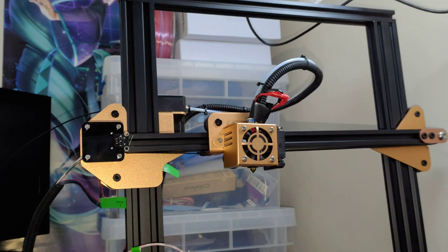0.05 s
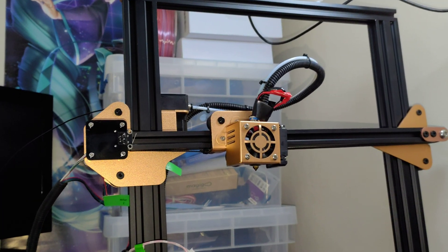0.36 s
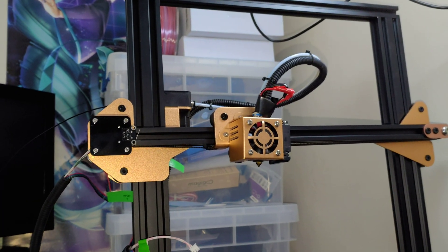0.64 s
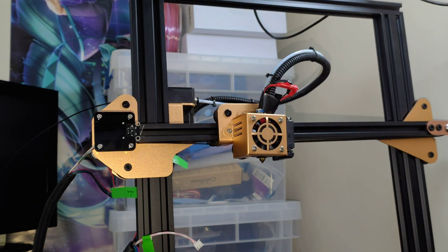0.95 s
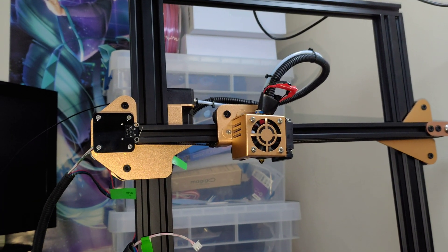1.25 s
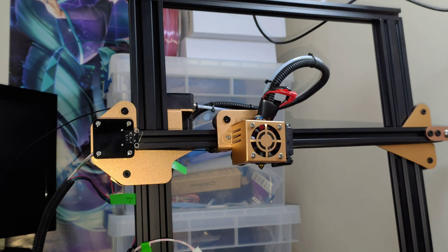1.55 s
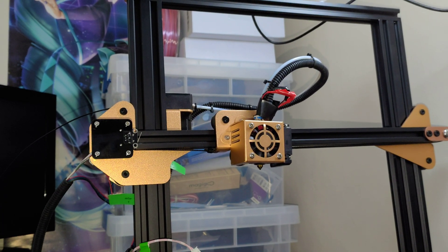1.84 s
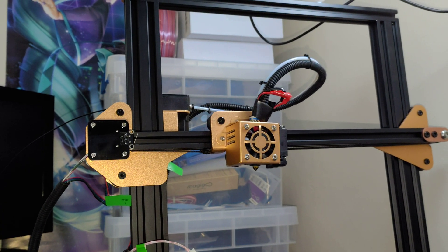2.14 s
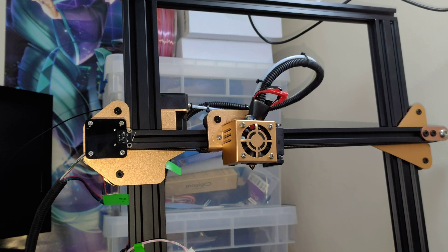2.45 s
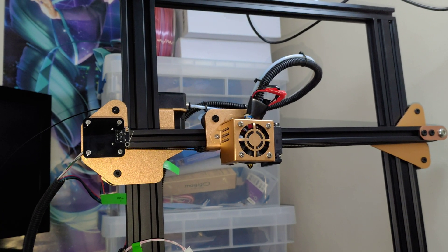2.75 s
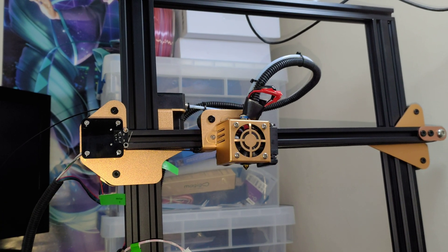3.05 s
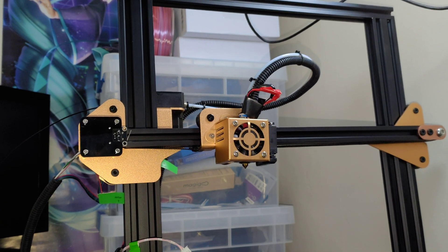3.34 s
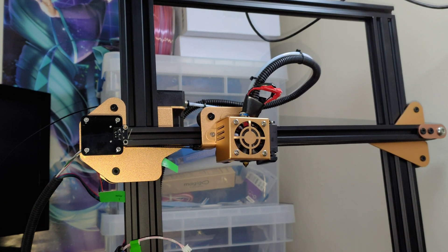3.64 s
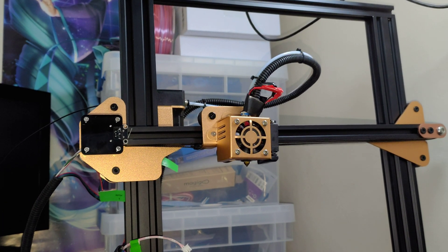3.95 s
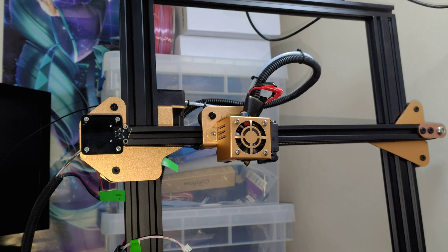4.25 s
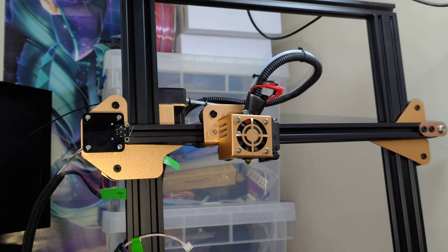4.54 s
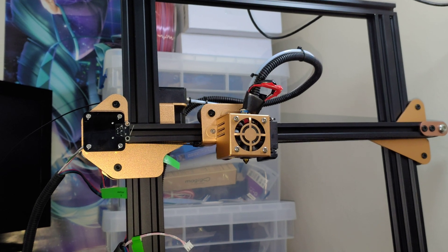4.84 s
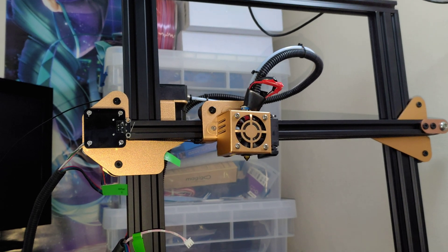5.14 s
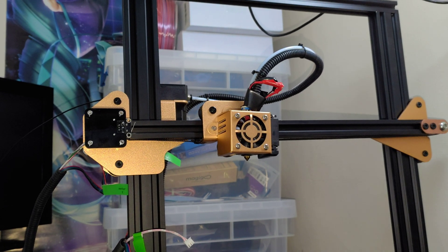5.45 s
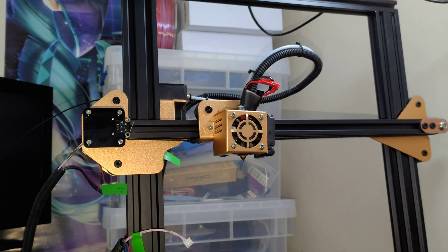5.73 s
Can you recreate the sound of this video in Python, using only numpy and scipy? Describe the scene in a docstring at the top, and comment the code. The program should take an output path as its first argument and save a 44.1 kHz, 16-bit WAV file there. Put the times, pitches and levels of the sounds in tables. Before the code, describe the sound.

After two close clicks, a small stepper motor jogs a printer carriage in five brief buzzing bursts, with ticks and a few soft knocks.

```python
"""Two sharp button clicks, close to a stereo microphone in a small room, over faint hum and hiss.
Then a stepper motor jogs the belt-driven carriage of a 3D printer five times. Each move jolts,
speeds up, cruises and brakes: the step orders sweep through the frame's resonances, belt and wheels
chatter, tick and squeak, and the carriage shudders on its belt while the speed changes.
Three soft knocks sound nearby, one before the moves and two towards the end."""
import sys
import numpy as np
from scipy import signal
from scipy.fft import rfft, irfft
from scipy.io import wavfile

SR = 44100
rng = np.random.default_rng(int(sys.argv[2]) if len(sys.argv) > 2 else 0)


def master(y):
    """Save y as 16-bit WAV."""
    cut = np.clip(np.atleast_2d(y).T, -1, 1)
    pcm = np.round(cut * 32767)  # scale
    wavfile.write(sys.argv[1], SR, pcm.astype(np.int16))


N = 264159
T = np.arange(N) / SR

# The carriage's moves. Each row: start, speed-up, cruise and braking in seconds, steps per second at
# the outset, then relative levels in dB of motor hum, jolt, chatter, braking bounce and stopping sway.
MOVES = [(2.058, .092, 0.079, 0.04, 50, -5, -5, -29.5, -35, -54),
         (2.902, .075, 0.069, 0.048, 110, -4.5, 0, -29.5, -35, -58),
         (3.737, 0.075, 0.0071, 0.11, 102.5, -3, 5.5, -29, -31, -44),
         (4.666, .070, .072, 0.053, 100, -5, 3.5, -29, -33, -51),
         (5.604, 0.069, 0.061, 0.044, 113, -3.5, 8.5, -30, -34, -56)]
def printer(chatter_trim_db=-1, jolt_trim_db=-2):
    """Each move hums through the gantry, rattles the rail and sets the carriage shuddering."""
    hum, jolts, pulley, carriage = np.zeros((4, N))
    swings = np.zeros((2, N))
    for *timing, first_rate, hum_db, jolt_db, chatter_db, bounce_db, sway_db in MOVES:
        cycles, speed = motion(*timing, first_rate)
        hum += undb(hum_db) * torque_ripple(cycles, speed)
        jolts += undb(jolt_db + jolt_trim_db) * jolt(timing[0])
        rattle = undb(chatter_db + chatter_trim_db) * looseness(*timing)
        pulley += rattle * chatter(cycles, speed)
        carriage += rattle * chatter(cycles, speed)
        swings += shudder(*timing, bounce_db, sway_db)
    return gantry(hum) + rail(jolts, pulley, carriage) + swings


def motion(start, rise, cruise, brake, first_rate, top_rate=297):
    """Coil cycles turned (four steps each) and share of top speed in a move; rates in steps a second."""
    corners = start + np.cumsum([0, rise, cruise, brake])
    rate = np.interp(T, corners, [first_rate, top_rate, top_rate, first_rate], left=0, right=0)
    rate *= 1 + .004 * wander(70)
    return np.cumsum(rate) / SR / 4, rate / top_rate


# The motor's orders. Each row: multiple of the coil current's cycle, relative level in dB.
MOTOR_ORDERS = [(2, -81), (4, -44.5), (6, -48), (8, -47.5), (10, -42.5), (12, -39), (14, -41.5), (16, -71),
                (18, -44), (20, -38.5), (22, -40.5), (25, -63), (26, -33.5), (32, -58), (64, -36.5)]
def torque_ripple(cycles, speed):
    """The stepper's uneven torque: clean orders that rise in pitch and level with speed."""
    orders = sum(undb(db) * np.sqrt(2) * np.sin(2 * np.pi * k * cycles) for k, db in MOTOR_ORDERS)
    return orders * speed ** 1.5 * (1 + .15 * wander(120))


# Resonances of gantry and desk. Each row: frequency in Hz, width in Hz, gain in dB.
GANTRY_MODES = [(133.8, 2.5, 1), (307.3, 11.4, 20.5), (340.7, 6.4, 10.5), (579.5, 10.6, 10),
                (1035, 5.3, -1), (1800, 23, -3)]
def gantry(hum):
    """The motor's hum drives gantry and desk, a little left of the microphone."""
    return room(resonate(hum, GANTRY_MODES), wet_db=-6.5, t60=.15, pan_db=2.5)


def jolt(start, decay_s=.004):
    """The slack parts clatter together as a move begins."""
    age = np.maximum(T - start, 0) / decay_s
    return unit(np.sqrt(age) * np.exp(-age) * rng.standard_normal(N)) / 2


def chatter(cycles, speed, spread_db=3, scatter_db=4, slip_cycles=.0026, per_cycle=18):
    """Loose parts tick at the same places of every coil cycle, never quite alike, harder at speed."""
    places = rng.random(per_cycle)
    sizes = undb(spread_db * rng.standard_normal(per_cycle)) * rng.choice([-1, 1], per_cycle)
    late, loud = np.clip(rng.standard_normal((2, 20, per_cycle)), -1.6, 1.6)
    tick_cycles = np.arange(20)[:, None] + places + slip_cycles * late
    reached, moving = tick_cycles < cycles[-1], speed > 0
    times = np.interp(tick_cycles[reached], cycles[moving], T[moving])
    strengths = (sizes * undb(scatter_db * loud))[reached]
    ticks = impulses(times, strengths / np.sqrt(np.interp(times, T, speed)))
    return unit(ticks) * np.sqrt(moving.sum()) * speed ** .71


def looseness(start, rise, cruise, brake, taut_db=-2, flare_db=2, braking_db=-4):
    """Chatter gain: held down by the taut belt, flaring as the slack snaps over, easing on braking."""
    cruising = start + rise
    flare = np.exp(-((T - cruising - .0085) / .012) ** 2)  # just after reaching full speed
    braked = np.clip((T - cruising - cruise) / brake, 0, 1)
    return undb(taut_db * (T < cruising) + flare_db * flare + braking_db * braked)


# Tone of the metal rail. Each row: frequency in Hz, relative level in dB.
RAIL_COLOUR = [(40, -63), (130, -14), (220, -27.5), (320, -4), (420, -22), (520, -5), (800, -5.5),
               (1300, -6), (1650, -6), (2550, 3), (2950, 0.5), (3500, -5), (4900, -2), (6500, -8.5),
               (9500, -19), (15500, -20.5)]
# The rail's ringing. Each row: frequency in Hz, width in Hz, gain in dB.
RAIL_MODES = [(1075, 30, 4), (1906, 102, 5), (2417, 150, -0.5), (2660, 120, -15.5), (4800, 300, -5.5),
              (5870, 50, 4.5)]
# A low ring that only the jolts wake. Each row: frequency in Hz, width in Hz, gain in dB.
JOLT_MODES = [(314, 20, 20)]
def rail(jolts, pulley, carriage, pan_db=-7.5):
    """Jolts and the chatter of pulley and carriage ring the rail, right of the microphone."""
    ring = unit(resonate(colour(RAIL_COLOUR, size=4096), RAIL_MODES))
    pulley_and_jolts = convolve(pulley + resonate(jolts, JOLT_MODES), ring)
    return (room(pulley_and_jolts, wet_db=4, t60=.043, pan_db=pan_db)
            + room(convolve(carriage, ring), wet_db=2, t60=.14, pan_db=pan_db))


def shudder(start, rise, cruise, brake, bounce_db, sway_db, belt_hz=136, gantry_hz=73.8):
    """The carriage bounces on its springy belt and the gantry sways, on speeding up and on braking."""
    cruising, braking, stop = start + np.cumsum([rise, cruise, brake])
    bounce = swell(braking + .04, bounce_db, 540, 620)
    frame_ring = swell(braking + .04, bounce_db - 6, 900, 160)  # lingers after the bounce
    belt = swell(cruising, -32, 220, 520) + np.maximum(bounce, frame_ring)
    sway = swell(cruising, -52.5, 460, 1100) + swell(stop - .016, sway_db, 700, 160)
    swings = np.zeros(N)
    for hz, envelope in [(belt_hz, belt), (gantry_hz, sway)]:
        flutter = undb(-.5 * wander(50))
        phase = 2 * np.pi * hz * (T - start) + .84 * wander(40)
        swings += envelope * flutter * np.sqrt(2) * np.sin(phase)
    attack = np.clip((T - start) / .016, 0, 1)
    return attack * swings * pan(2)


def swell(crest_s, db, rise_db_per_s, fall_db_per_s, linger_s=.022):
    """Envelope of a swing that builds up to a rounded crest and dies away."""
    away_s = np.hypot(T - crest_s, linger_s) - linger_s
    return undb(db - np.where(T < crest_s, rise_db_per_s, fall_db_per_s) * away_s)


# Bright ticks of the belt on its pulley. Each row: time in seconds, relative level in dB.
BELT_TICKS = [(2.246, -11), (2.901, -0.5), (2.922, -3.5), (3.74, 0.5), (3.766, -3), (3.85, -2.5),
              (3.873, -5.5), (4.666, -0.5), (5.607, -6)]
# Tone of a tick. Each row: frequency in Hz, relative level in dB.
TICK_COLOUR = [(1500, -63), (6000, 10.5), (8200, 6), (10500, 1.5), (15500, -4)]
def belt_ticks(crackle_db=-51, spread_db=5):
    """Belt teeth slip into the pulley: fine crackle and louder ticks, heard mostly off the walls."""
    speed = sum(motion(*move[:5])[1] for move in MOVES)
    grains = (rng.random(N) < .02) * rng.standard_normal(N) * undb(spread_db * rng.standard_normal(N))
    crackle = undb(crackle_db) * unit(grains) * np.sqrt(N) * speed ** .43
    times, db = np.transpose(BELT_TICKS)
    ticks = impulses(np.round(times * SR) / SR, undb(db) / 2)
    return room(convolve(ticks + crackle, colour(TICK_COLOUR)), wet_db=10, t60=.2, pan_db=-2)


# Thin wheel squeaks. Each row: peak time in seconds, length in seconds, level in dB.
SQUEAKS = [(2.183, 0.028, -24), (2.248, 0.018, -32), (3.002, 0.019, -24.5)]
# Tone of a squeak. Each row: frequency in Hz, relative level in dB.
SQUEAK_COLOUR = [(5000, -51), (8000, 5), (11000, -17), (13000, 5), (14100, -29), (15100, 7), (16500, 5.5)]
def wheel_squeaks():
    """Brief, very high rubbing of the wheels on the rail, right of centre."""
    envelope = sum(undb(db) * np.exp(-(2 * (T - peak) / length) ** 2) for peak, length, db in SQUEAKS)
    rubbing = convolve(rng.standard_normal(N), colour(SQUEAK_COLOUR))
    return room(envelope * rubbing, wet_db=4, t60=.058, pan_db=-4)


# Clicks near the microphone. Each row: start in seconds, relative level in dB, cut-off in Hz, snap in dB.
CLICKS = [(.5443, 3.5, 4500, -9), (.7305, 5.5, 1060, -11)]
# The button's modes. Each row: frequency in Hz, relative level in dB, seconds to fall 60 dB.
BUTTON_MODES = [(168, -25, 0.041), (421, -18.5, 0.23), (562, -13.5, 0.15), (680, -9.5, 0.056),
                (936, 10.5, 0.03), (934, 10, 0.022), (1024, 8, 0.025), (1696, 2, 0.022), (1820, -17, 0.3),
                (2026, 2, 0.024), (2570, 0, 0.025), (2780, -2, 0.056), (3290, -14, 0.039),
                (5630, -12, 0.076)]
# Soft knocks nearby. Each row: start in seconds, relative level in dB, cut-off in Hz, snap in dB.
KNOCKS = [(1.750, -23, 900, -22), (5.293, -7.5, 1450, -6.5), (5.909, -14, 3480, -6.5)]
# The knocked panel's modes. Each row: frequency in Hz, relative level in dB, seconds to fall 60 dB.
PANEL_MODES = [(417, -15, 0.037), (533.5, -6, 0.14), (613, 9, 0.02), (642, 8, 0.021), (740, -22, 0.085),
               (864, -15, 0.037), (1010, -14, 0.11), (1670, -20, 0.12)]
# Tone of the snap on contact. Each row: frequency in Hz, relative level in dB.
SNAP_COLOUR = [(200, -0.5), (700, -1), (1300, 2), (3000, -11), (4200, -12.5), (6000, -16), (9000, -24.5),
               (15000, -21)]
def taps(blows, modes, thin_hz=160):
    """Each blow snaps and rings the object's modes, dulled by its own cut-off."""
    t = T[:SR // 3]
    ring = unit(sum((-1) ** k * undb(db) * np.sin(2 * np.pi * hz * t) * np.exp(-np.log(1000) * t / t60)
                    for k, (hz, db, t60) in enumerate(modes)))
    out = np.zeros(N)
    for start, db, cutoff_hz, snap_db in blows:
        burst = rng.standard_normal(len(t)) * np.exp(-t / .014)
        snap = signal.fftconvolve(burst, colour(SNAP_COLOUR))[:len(t)]
        tap = lowpass(ring, cutoff_hz, order=2) + undb(snap_db) * unit(snap)
        out += convolve(impulses(round(start * SR) / SR, undb(db) / 2), tap)
    # the blows carry little bass
    return signal.sosfilt(signal.butter(2, thin_hz, "high", fs=SR, output="sos"), out)


# The room's faint hum. Each row: frequency in Hz, level in dB.
ROOM_HUM = [(40.5, -75.5), (99.8, -65.5), (138, -74), (284, -76.5)]
# Tone of the hiss. Each row: frequency in Hz, relative spectral density in dB.
HISS_COLOUR = [(20, -22), (45, -50), (80, 5.5), (190, -3.5), (300, -1.5), (500, -5.5), (1000, -8.5),
               (2100, -9.5), (3200, -15.5), (5000, -21.5), (9800, -24.5), (12500, -16), (14500, -10),
               (16000, -12)]
def room_tone(hiss_db=-61, apart_hz=700):
    """Low wavering hum and an even hiss, centred in the bass and wide in the treble."""
    mid, side = (convolve(rng.standard_normal(N), colour(HISS_COLOUR, size=8192)) for _ in range(2))
    side = undb(1.5) * (side - lowpass(side, apart_hz))
    hum = np.zeros(N)
    for hz, db in ROOM_HUM:
        level = undb(db) * np.sqrt(2) * (1 + .16 * wander(8.2))
        hum += level * np.sin(2 * np.pi * hz * T + .069 * wander(10))
    return hum + undb(hiss_db) * np.array([mid + side, mid - side])


def room(x, wet_db, t60, pan_db, bass_hz=420, port_lag_s=.0002895):
    """Direct sound at two microphone ports plus dense short reflections; the bass reaches both alike."""
    t = T[:SR // 2]
    tails = unit(rng.standard_normal((2, len(t))) * np.exp(-np.log(1000) * t / t60) * (t > .002))
    bass = lowpass(lowpass(x, bass_hz, order=2)[::-1], bass_hz, order=2)[::-1]
    upper = x - bass
    direct = np.array([upper, np.interp(T - port_lag_s, T, upper)])
    reflections = undb(wet_db) * np.array([convolve(upper, tail) for tail in tails])
    return bass + (direct + reflections) * pan(pan_db) / np.hypot(1, undb(wet_db))


def pan(db):
    """Left and right gains; positive dB favours the left."""
    return undb([[db / 2], [-db / 2]])


def undb(db):
    """Decibels to gain."""
    return 10 ** (np.asarray(db) / 20)


def unit(x):
    """Scale to energy 1."""
    return x / np.sqrt(np.sum(x ** 2, axis=-1, keepdims=True))


def convolve(x, response):
    """Play a sound through an impulse response."""
    return signal.oaconvolve(x, response)[:N]


def colour(points, size=2048):
    """Causal impulse response of energy 1 with a (Hz, dB) spectrum."""
    hz, db = np.transpose(points)
    grid = np.maximum(np.fft.rfftfreq(size, 1 / SR), 1)
    gains = undb(np.interp(np.log(grid), np.log(hz), db))
    cepstrum = irfft(np.log(gains))
    cepstrum[1:size // 2] *= 2  # fold to minimum phase
    cepstrum[size // 2 + 1:] = 0
    return unit(irfft(np.exp(rfft(cepstrum))))


def lowpass(x, hz, order=1):
    """Gentle low-pass."""
    return signal.sosfilt(signal.butter(order, hz, fs=SR, output="sos"), x + 1e-18)


def resonate(x, modes):
    """The sound itself plus the (Hz, width in Hz, dB) resonances that it drives."""
    return x + sum(undb(db) * signal.lfilter(*signal.iirpeak(hz, hz / width, SR), x + 1e-18)
                   for hz, width, db in modes)


def wander(rate_hz):
    """Random drift with a spread near 1."""
    knots = rng.standard_normal(4096)
    return np.interp(T * rate_hz, np.arange(len(knots)), knots)


def impulses(times, sizes):
    """Impulses, each shared between two neighbouring samples."""
    at = np.clip(np.atleast_1d(times) * SR, 0, N - 2)
    index, part = at.astype(int), at % 1
    return np.bincount(index, sizes * (1 - part), N) + np.bincount(index + 1, sizes * part, N)


def scene():
    """The printer in the quiet room, with clicks and knocks close to the microphone."""
    clicks, knocks = taps(CLICKS, BUTTON_MODES), taps(KNOCKS, PANEL_MODES)
    near = room(clicks + knocks, wet_db=-2, t60=.12, pan_db=0)
    return printer() + belt_ticks() + wheel_squeaks() + near + room_tone()


def record(dry):
    """The phone cuts the treble steeply above 15850 Hz."""
    return signal.sosfilt(signal.ellip(10, .2, 70, 15850, fs=SR, output="sos"), dry)


dry = scene()
out = record(dry)
master(out)
```